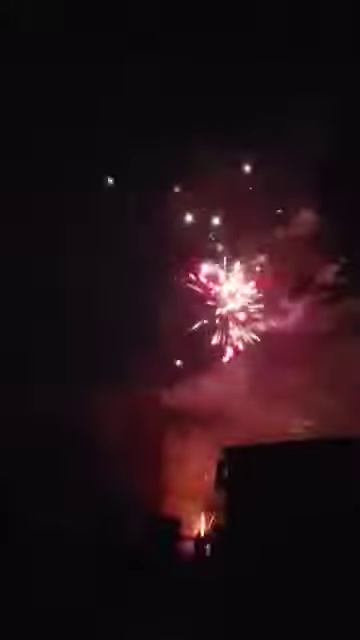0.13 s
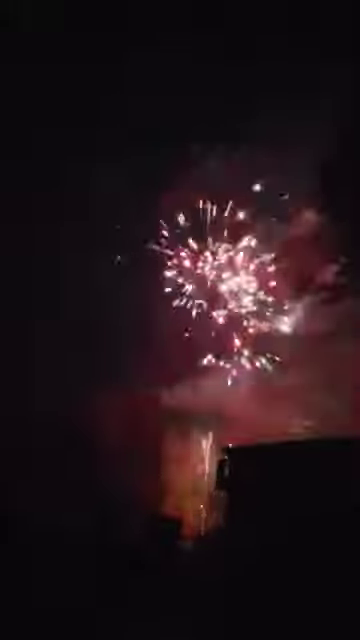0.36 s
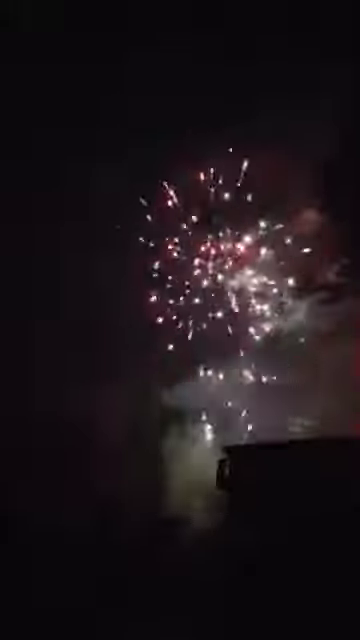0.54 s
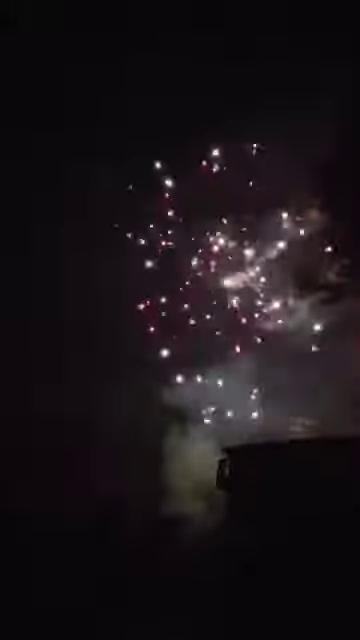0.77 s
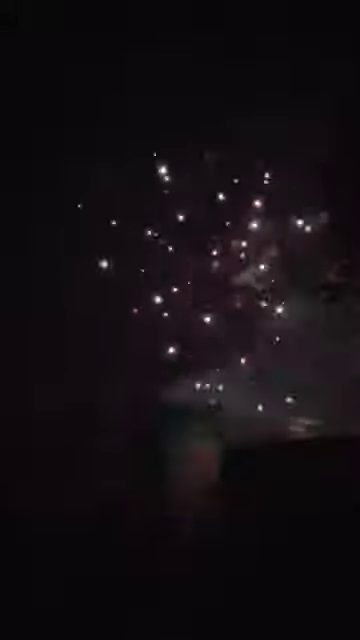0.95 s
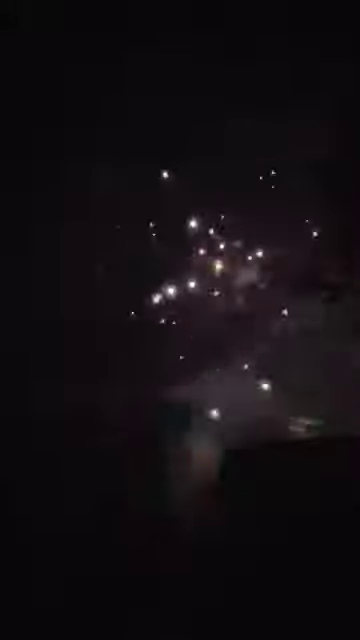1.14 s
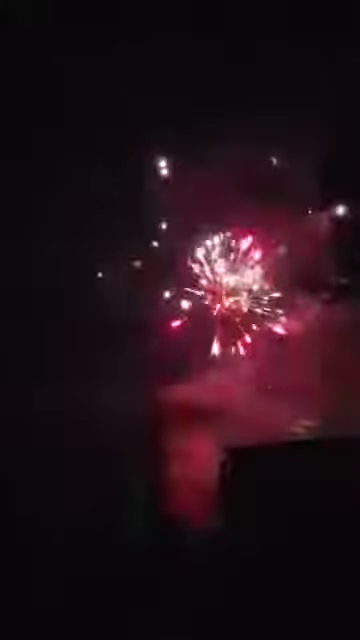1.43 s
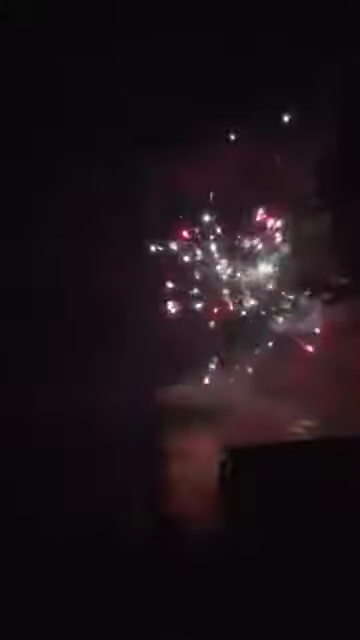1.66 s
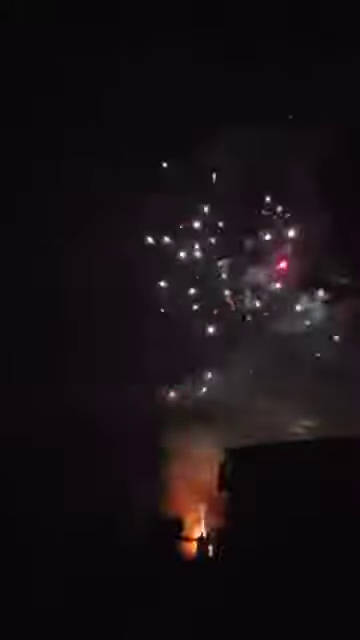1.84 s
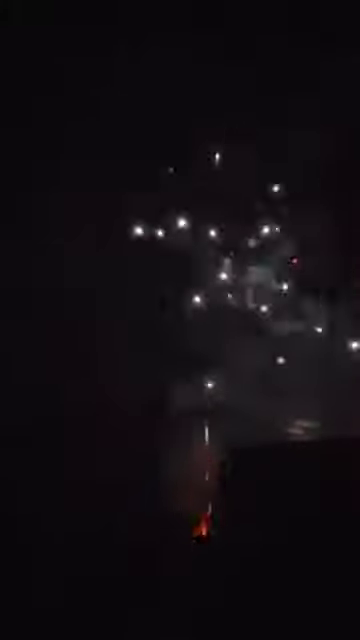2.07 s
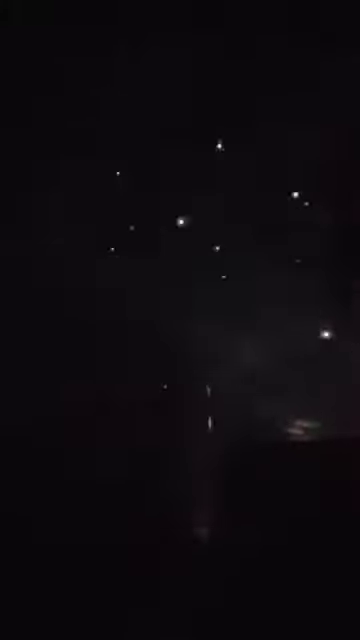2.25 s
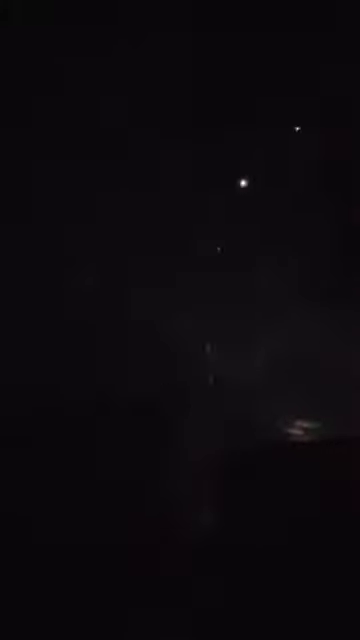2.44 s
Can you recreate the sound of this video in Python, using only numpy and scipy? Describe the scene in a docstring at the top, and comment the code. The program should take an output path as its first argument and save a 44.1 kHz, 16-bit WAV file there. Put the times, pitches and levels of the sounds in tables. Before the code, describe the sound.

Fireworks burst overhead outdoors, starting with the low rumble of an earlier shell. Two sharp, loud bangs hit at about 0.25 and 0.4 seconds, with a smaller launch pop between them. Another bang comes at 1.45 seconds. Each slaps off nearby walls and leaves a quickly fading roar. From 2.0 to 2.15 seconds, three rapid launch cracks with hollow thumps echo away, while the distant rumble lingers.

```python
"""Firework shells burst overhead at night near houses, each with a short, sharp shock wave.
Lift charges, which launch the shells, crack on the ground and make their tubes thump.
Nearby walls throw back single slaps and a bright roar that fades fast; distant hills return
a long, low rumble. Under it all lies a faint hiss. A phone with two microphones hears the scene,
and its limiter holds the bangs just under full scale."""
import sys
import numpy as np
from scipy import signal
from scipy.fft import rfft, irfft, next_fast_len
from scipy.io import wavfile
from scipy.ndimage import uniform_filter1d, minimum_filter1d

SR = 44100
rng = np.random.default_rng(int(sys.argv[2]) if len(sys.argv) > 2 else 0)


def waveform_to_disk(signal):
    """Save audio, clipped to [-1, 1], as 16-bit WAV at the path in sys.argv[1]."""
    frames = np.transpose(np.atleast_2d(signal))
    scaled = np.clip(frames, -1, 1) * 32767
    samples = np.round(scaled).astype(np.int16)
    wavfile.write(sys.argv[1], SR, samples)


N = 114660
RUMBLE_BASS_HZ = 350  # the rumble's bass lies below this


def shell_bursts():
    """Each bursting shell sends out a shock wave that returns as slaps, a roar and a far rumble."""
    # shells; the first bursts before the sound begins: (time [s], shock [dB], roar [dB], rumble [dB],
    # rumble's bass boost [dB], sharp edge relative to shock [dB], boost of first echoes [dB])
    shells = [(-0.64, -1, -16.5, -25.5, 4.5, -16, 0), (.2468, 1, -17, -23, 2, -16, 0),
              (.4218, 0.5, -17.5, -26.5, 3.5, -17, 3), (1.4525, 0.3, -19, -26, -9.5, -15.5, 0)]
    # the direct shock, then its first echoes off ground and walls: (delay [s], gain [dB], left lag [s])
    shock_paths = [(0, 4, -.00005), (.0031, -3.5, .0004), (.0047, -10, .0002), (0.0101, -11.5, 0)]
    # strong echoes of the shock off single walls: (time [s], level [dB], left lag [s])
    wall_returns = [(0.2559, -17, 0), (.2825, -6, .0001), (0.2918, -17, -.0002), (0.3088, -17, .0002),
                    (0.315, -9.5, -.0001), (0.433, -12, 0), (0.4489, -6, .0001), (0.569, -10, 0),
                    (1.4803, -13, .0001), (1.4929, -10, -.0001), (1.5165, -11.5, .0001), (1.5312, -16, 0),
                    (1.647, -24, .0001)]
    # tone of the roar as heard, with a narrow dip near 7.6 kHz: (frequency [Hz], level [dB])
    roar_tone = [(35, -43), (100, -21.5), (200, -14), (300, -2.5), (700, 0.5), (1250, -14.5), (2400, -12),
                 (6500, -20.5), (7600, -35.5), (9000, -30.5), (14500, -33), (15400, -58)]
    # tone of the far rumble: (frequency [Hz], level [dB])
    rumble_tone = [(35, -16), (100, -28), (200, -15), (370, -7), (690, -7), (900, -8.5), (1100, -24),
                   (1440, -16.5), (3020, -30), (4000, -81), (8800, -120)]
    # how long the roar and the rumble last: (frequency [Hz], time to fade by 60 dB [s])
    roar_fade = [(150, 0.75), (500, 0.55), (1500, 1.82), (3000, 1.765), (4500, 1.43), (6500, 1.24),
                 (9000, 0.77), (14000, 0.47)]
    rumble_fade = [(150, 7.3), (300, 9), (600, 7.8), (3000, 4.85)]
    front_s, tick_s, scatter_db = .00035, .0001, 2
    shock = shock_wave(length_s=.001, rise_s=front_s, suction=.6, recovery=2.6)
    low_cut = signal.butter(1, 190, 'high', fs=SR)  # a small shell makes little deep bass
    shock = signal.lfilter(*low_cut, np.pad(shock, (0, SR // 100)))
    tick = shock_wave(tick_s, tick_s / 3)  # the hard edge on the shock's front
    out = np.zeros((2, N))
    for start, shock_db, roar_db, rumble_db, bass_db, edge_db, echo_db in shells:
        for delay, path_db, lag in shock_paths:
            boost_db = (delay > 0) * (echo_db + scatter_db * rng.standard_normal())
            add(out, start + delay, amp(shock_db + path_db + boost_db) * shock, lag)
        add(out, start + front_s, amp(shock_db + edge_db) * tick)
        add(out, start, amp(shock_db + edge_db) * ragged_crack())
        out += wall_slaps(start, shock_db, shock, count=24)
        out += echo_wash(start, roar_db, roar_tone, roar_fade, swell_s=.011)
        rumble = echo_wash(start, rumble_db, rumble_tone, rumble_fade,
                           swell_s=.44, hill_db=1, bass_drop_db=-12)
        out += filtered(rumble, lambda hz: amp(bass_db * bass_share(hz)))
    for start, level_db, lag in wall_returns:
        add(out, start, amp(level_db) * shock, lag)
    return out


def shock_wave(length_s, rise_s, suction=1, recovery=1):
    """Air pressure jumps up, falls below normal, then comes back: a wave shaped like the letter N."""
    end_s = length_s + recovery * rise_s
    t = np.arange(int(end_s * SR) + 2) / SR
    return np.interp(t, [0, rise_s, length_s, end_s], [0, 1, -suction, 0])


def ragged_crack(fade_s=.016, top_hz=6900):
    """The noisy crack on the front of a blast, duller above top_hz."""
    t = np.arange(SR // 50) / SR
    noise = signal.lfilter(*signal.butter(1, top_hz, fs=SR), rng.standard_normal(len(t)))
    return amp(-.5 - 60 * t / fade_s) * noise


def lift_charges():
    """Each launch gives a double crack, a bright snap and a thump, and the walls answer."""
    # launches: (time [s], crack [dB], thump [dB], roar [dB], snap [dB], crack's left over right [dB])
    launches = [(0.36, -6, -8, -28.5, -31, 0), (2.0315, 2.5, -6, -21, -20, 2.5),
                (2.081, -1.5, -2, -26.5, -33, 2), (2.1273, -4.5, -9.5, -27.5, -17, -11)]
    # tone of the roar as heard, with a narrow dip near 7.6 kHz: (frequency [Hz], level [dB])
    roar_tone = [(35, -35), (100, -17), (220, -9.5), (430, -9), (840, -11.5), (2050, -12), (6500, -20),
                 (7600, -38.5), (9000, -27.5), (14500, -33.5), (15400, -63.5)]
    # how long the roar lasts: (frequency [Hz], time to fade by 60 dB [s])
    roar_fade = [(150, 1.3), (500, 1), (1500, 1.53), (3000, 1.05), (6000, 0.9), (9000, 0.5), (14000, 0.28)]
    # echoes of the thump off walls: (time [s], level [dB])
    thump_returns = [(2.157, -15), (2.169, -11.5), (2.192, -11.5), (2.2176, -10), (2.24, -14),
                     (2.2647, -11), (2.351, -21)]
    # echoes of the crack off walls: (time [s], crack [dB], snap [dB])
    crack_returns = [(2.0558, -17, -26.5), (2.0692, -13, -24.5), (2.1125, -11, -23), (2.1183, -9, -28),
                     (2.1655, -17, -18), (2.187, -9.5, -25.5)]
    crack_s, lag_s = .0005, .00025  # the sound reaches the right microphone first
    crack = shock_wave(crack_s, crack_s / 5, suction=.5)
    thump = tube_thump()
    out = np.zeros((2, N))
    for start, crack_db, thump_db, roar_db, snap_db, lean_db in launches:
        add(out, start, amp(crack_db) * crack, lag_s, lean_db)
        add(out, start + .0007, amp(crack_db - 9) * crack, lag_s)
        add(out, start, snap(snap_db, top_hz=12400), lag_s)
        add(out, start, amp(thump_db) * thump, lag_s)
        add(out, start + .00948, amp(thump_db - 15) * thump)  # bounce off the ground
        out += wall_slaps(start, roar_db + 25, crack, count=12)
        out += echo_wash(start, roar_db, roar_tone, roar_fade, swell_s=.02)
    low_cut = signal.butter(2, 171, 'high', fs=SR)  # walls return little of the thump's bass
    thin_thump = signal.lfilter(*low_cut, thump)
    for start, level_db in thump_returns:
        add(out, start, amp(level_db) * thin_thump, lag_s)
    for start, crack_db, snap_db in crack_returns:
        add(out, start, amp(crack_db) * crack, lag_s)
        add(out, start, snap(snap_db, top_hz=5000), lag_s)  # a returned snap is duller
    return out


def tube_thump(pitch_hz=177, rise_s=.00063, fade_s=.023):
    """The launch tube sucks air back in and rings briefly on a low note."""
    t = np.arange(SR // 8) / SR
    loudness = amp(-60 * t / fade_s) * (1 - np.exp(-t / rise_s))
    return loudness * np.cos(2 * np.pi * pitch_hz * t + .6)


def snap(level_db, top_hz, fade_s=.018):
    """A lift charge's short burst of bright noise, duller above top_hz."""
    t = np.arange(SR // 20) / SR
    noise = signal.lfilter(*signal.butter(2, top_hz, fs=SR), rng.standard_normal(len(t)))
    return amp(level_db - 60 * t / fade_s) * noise


def wall_slaps(start, level_db, blast, count, fade_s=.82, scatter_db=7, max_lag_s=.0014):
    """Single walls return a blast at random moments from random sides; later slaps are weaker."""
    out = np.zeros((2, N))
    for distance, size, side in rng.random((count, 3)):
        delay = .015 + distance * fade_s / 3
        slap_db = level_db - 19.5 - 60 * delay / fade_s + scatter_db * (2 * size - 1)
        add(out, start + delay, amp(slap_db) * blast, max_lag_s * (2 * side - 1))
    return out


def echo_wash(start, level_db, tone, fade_times, swell_s, hill_db=0, bass_drop_db=0):
    """Countless echoes blur into noise that builds up, then dies at its own speed at each frequency."""
    # how alike the two microphones sound: (frequency [Hz], likeness [1 = same, 0 = unrelated])
    likeness = [(60, 1), (150, 1), (380, 0.93), (950, 0.092), (2380, -0.074), (5980, 0.0034), (15000, 0.11)]
    # which side is louder: (frequency [Hz], left over right [dB])
    balance = [(60, -1), (130, 1.5), (290, -2.5), (640, 1.5), (1410, -4.5), (3100, -3.5), (6820, -2.5),
               (15000, 6)]
    hold_s, hill_s, last_slope_s = .043, .831, 1.19  # all counted from the bang
    hz, t, noise = signal.stft(rng.standard_normal((2, N)), SR, nperseg=256)
    age = np.maximum(t - start - 64 / SR, 0)
    lumps_db = patches(noise.shape[1:], bands=24, frames=5)  # single echoes stand out
    colour_db = 3 * patches(noise.shape[1:], bands=1, frames=30)  # walls favour narrow bands
    answer_db = hill_db * np.exp(-((age - hill_s) / .03) ** 2)  # a far slope answers
    # once the farthest big slope has answered, the bass drops away
    bass_gone = (1 + np.tanh((age - last_slope_s) / .04)) / 2
    bass_db = bass_drop_db * bass_gone * bass_share(hz)[:, None]
    fade_db = -60 * np.maximum(age - hold_s, 0) / along(fade_times, hz)[:, None]
    swell = 1 - np.exp(-age / swell_s)
    echoes = noise * amp(level_db + fade_db + lumps_db + colour_db + answer_db + bass_db) * swell
    # the microphones share one noise (mid) and get the other with opposite signs (side)
    width = np.arccos(np.clip(along(likeness, hz), -1, 1))[:, None] / 2
    mid, side = echoes[0] * np.cos(width), echoes[1] * np.sin(width)
    lean = amp(along(balance, hz) / 2)[:, None]
    left_right = np.array([(mid + side) * lean, (mid - side) / lean])
    wash = signal.istft(left_right, SR, nperseg=256)[1][:, :N]
    tone_power = np.mean(amp(along(tone, np.linspace(0, SR / 2, num=4096))) ** 2)
    return filtered(wash, lambda f: amp(along(tone, f)) / np.sqrt(tone_power))


def night_hiss(level_db=-76):
    """A faint, steady hiss behind everything."""
    return amp(level_db) * rng.standard_normal((2, N))


def patches(shape, bands, frames):
    """Random ups and downs, smoothed across frequency bands and time frames."""
    field = uniform_filter1d(rng.standard_normal(shape), bands, axis=0)
    field = uniform_filter1d(field, frames, axis=1)
    return field / field.std()


def bass_share(hz):
    """Near 1 in the rumble's bass, falling to 0 above it."""
    return 1 / (1 + (hz / RUMBLE_BASS_HZ) ** 4)


def amp(db):
    """Turn decibels into a multiplier."""
    return 10 ** (np.asarray(db) / 20)


def along(points, hz):
    """Read between (frequency, value) points, with octaves evenly spaced."""
    frequencies, values = np.transpose(points)
    return np.interp(np.log(hz + 1), np.log(frequencies + 1), values)


def filtered(sound, response):
    """Multiply each frequency in a sound by response(hz)."""
    size = next_fast_len(N + SR // 2)
    hz = np.fft.rfftfreq(size, 1 / SR)
    return irfft(rfft(sound, size) * response(hz), size)[..., :N]


def add(out, start, sound, lag_s=0., lean_db=0.):
    """Mix a sound in, lag_s later and lean_db louder on the left; skip it if it starts before zero."""
    for channel, side in zip(out, (.5, -.5)):
        i = round((start + side * lag_s) * SR)
        if i >= 0:
            channel[i:i + len(sound)] += amp(side * lean_db) * sound[:N - i]


def scene():
    """All the bangs and their echoes over faint hiss."""
    return shell_bursts() + lift_charges() + night_hiss()


def record(dry):
    """Small microphones lose bass, a limiter turns down the peaks, and the highest treble is cut."""
    bass_cut_hz, floor_db, roll_hz, top_hz = 105, -35, 15700, 16350
    ceiling, hold_s, release_s = .97, .0012, .0015

    def bass_cut(hz):
        """Deep bass is cut steeply, leaving a faint low floor under the bangs."""
        s = 1j * hz / bass_cut_hz
        low_cut = s ** 2 / (1 + 1.41 * s + s ** 2)
        return low_cut ** 2 + amp(floor_db) * (hz > 10)

    heard = filtered(dry, bass_cut)
    safe_gain = np.minimum(1, ceiling / (np.abs(heard).max(0) + 1e-9))
    release = int(release_s * SR) + 1
    held_gain = minimum_filter1d(safe_gain, int(hold_s * SR) + release)
    limited = heard * uniform_filter1d(held_gain, release)
    return filtered(limited, lambda hz: np.clip((top_hz - hz) / (top_hz - roll_hz), 0, 1) ** 2)


dry = scene()
out = record(dry)
waveform_to_disk(out)
```